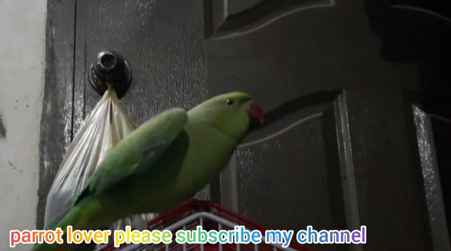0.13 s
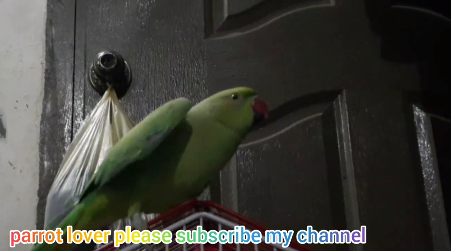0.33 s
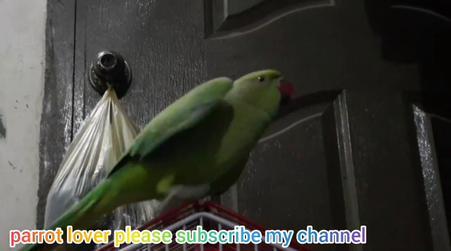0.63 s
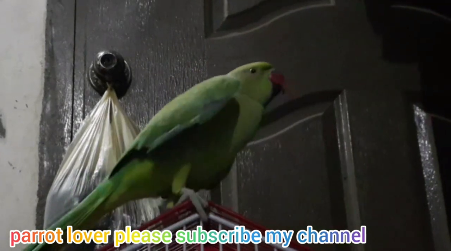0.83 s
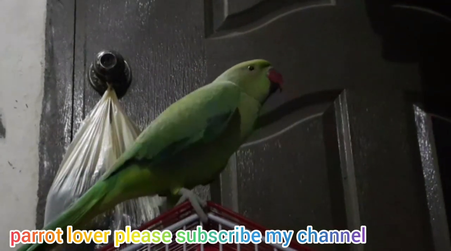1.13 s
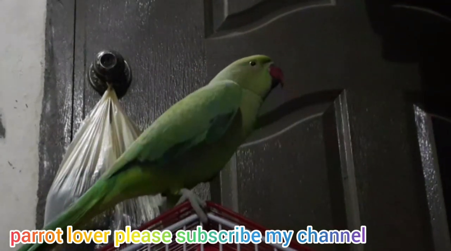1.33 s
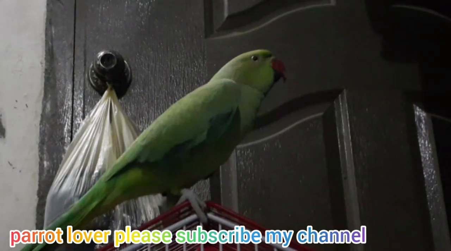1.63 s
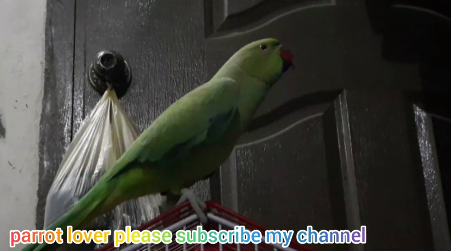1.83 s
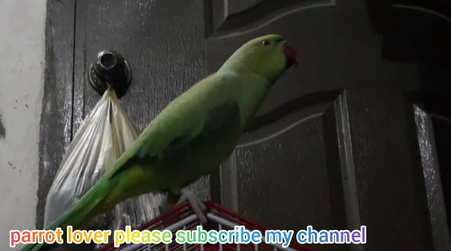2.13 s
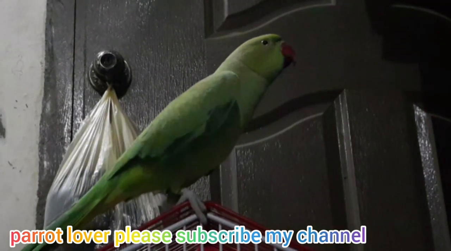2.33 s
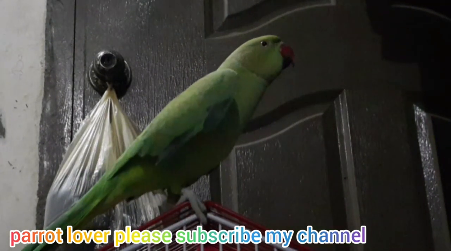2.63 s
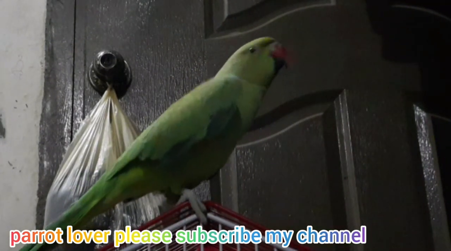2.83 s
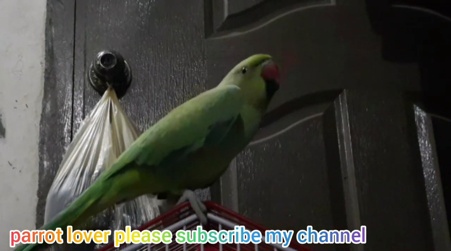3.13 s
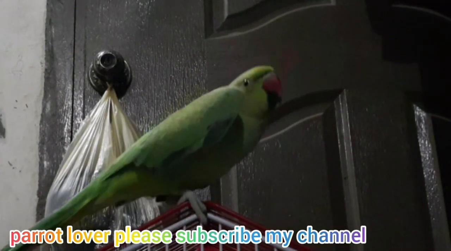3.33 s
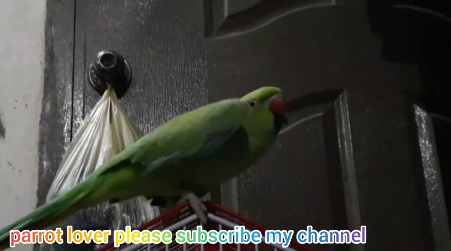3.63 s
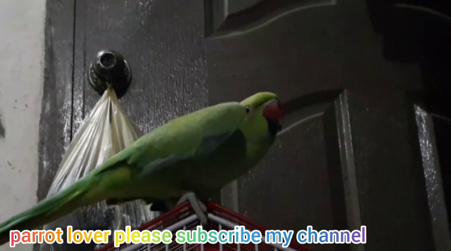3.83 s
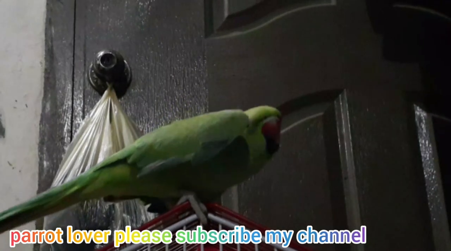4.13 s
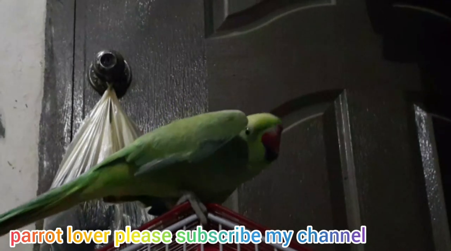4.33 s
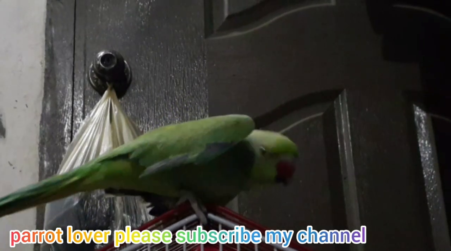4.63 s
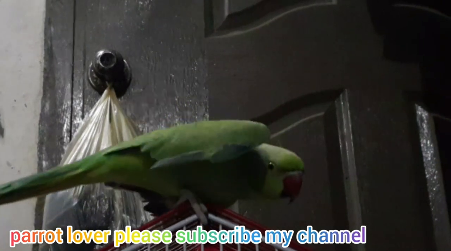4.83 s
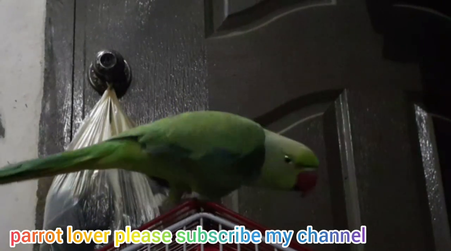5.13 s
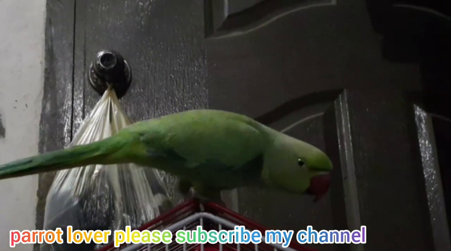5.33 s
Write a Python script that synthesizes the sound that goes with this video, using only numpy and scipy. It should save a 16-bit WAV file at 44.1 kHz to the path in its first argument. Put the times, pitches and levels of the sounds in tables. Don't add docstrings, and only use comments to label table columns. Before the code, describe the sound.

Close indoor parrot calls: piercing chirps, a run of soft throaty clucks, a loud short rattle, then squawk, falling whistle and long arching squawk.

```python
import sys
import numpy as np
from scipy import signal
from scipy.fft import rfft, irfft, next_fast_len
from scipy.io import wavfile
from scipy.ndimage import uniform_filter1d, map_coordinates

SR = 44100
rng = np.random.default_rng(int(sys.argv[2]) if len(sys.argv) > 2 else 0)


def makeup_ratio(level_db):
    decades = np.asarray(level_db, float) / 20
    return 10 ** decades


def wav_out(sig):
    wavfile.write(sys.argv[1], SR, np.round(np.clip(np.atleast_2d(sig).T, -1, 1) * 32767).astype(np.int16))


N = 242550
TIME_S = np.arange(N) / SR

# time of the top pitch in seconds, run-up in seconds, top pitch in Hz, peak level in dB.
CLUCK_EVENTS = [
    (1.807, 0.018, 1120, -39),
    (1.99, 0.016, 1004, -31.5),
    (2.213, .056, 967, -28),
    (2.453, .058, 930, -29.5),
    (2.701, 0.055, 951, -30),
]
CLUCK_PAN_DB = -4


def unit(x):
    return x / np.sqrt(np.mean(x ** 2) + 1e-20)


def along(points, hz):
    f, v = np.transpose(points)
    return np.interp(np.log(hz + 1), np.log(f + 1), v)


def curves(rows, t):
    s, *cols = np.transpose(rows)
    return [np.interp(t, s, c) for c in cols]


def wobble(rate_hz, size=N):
    knots = rng.standard_normal(int(size * rate_hz / SR) + 4)
    return map_coordinates(knots, [np.arange(size) * rate_hz / SR])


def phase_of(hz):
    return 2 * np.pi * np.cumsum(hz) / SR


def filtered(x, response):
    m = next_fast_len(N + SR // 2)
    return irfft(rfft(x, m) * response(np.fft.rfftfreq(m, 1 / SR)), m)[..., :N]


def resonances(modes, hz):
    total = 0
    for k, (centre_hz, width_hz, db) in enumerate(modes):
        damping = 1j * hz * width_hz
        total = total + (-1) ** k * makeup_ratio(db) * damping / (centre_hz ** 2 - hz ** 2 + damping)
    return total


def sides(pan_db):
    return makeup_ratio(np.array([pan_db / 2, -pan_db / 2]))


def noise_pair(spectrum, alike):
    def shares(hz):
        turn = np.arccos(np.clip(along(alike, hz), -1, 1)) / 2
        return makeup_ratio(along(spectrum, hz)) * [np.cos(turn), np.sin(turn)]
    mid, side = filtered(rng.standard_normal((2, N)), shares)
    return unit(np.array([mid + side, mid - side]))


def soft_tone(rows, unsteady_db):
    hz, db = curves(rows, TIME_S)
    edge = np.clip(np.minimum(TIME_S - rows[0][0], rows[-1][0] - TIME_S) / 0.0069, 0, 1)
    return edge * makeup_ratio(db + 7.5 + unsteady_db * wobble(30)) * np.sin(phase_of(hz))


def hiss():
    # frequency in Hz, density in dB per Hz.
    hiss_spectrum = [(3000, -30), (9000, -9), (12500, 0), (16000, -2)]
    return makeup_ratio(-87) * noise_pair(hiss_spectrum, [(5000, 0.0074)])


def hum(bird):
    # frequency in Hz, density in dB per Hz.
    hum_spectrum = [(22, -22), (38, -5.5), (57, -11.5), (70, -10.5), (178, -5.5), (318, -6), (420, -14),
                    (464, -7), (540, -12.5), (830, -13.5), (1100, -21), (1640, -19.5), (2120, -29.5),
                    (12700, -38.5), (16000, -41)]
    # frequency in Hz, left-right likeness from -1 to 1.
    hum_likeness = [(60, 1), (240, 0.77), (950, 1), (3770, -0.18), (15000, -0.4)]
    hum_db, lift_db, lift_s, lift_from_db, lift_range_db = -70.5, 7, 0.23, -57.5, 34.5
    power = uniform_filter1d(bird.mean(axis=0) ** 2, round(lift_s * SR))
    bird_db = 10 * np.log10(abs(power) + 1e-12)
    air_db = hum_db + lift_db * np.clip((bird_db - lift_from_db) / lift_range_db, 0, 1)
    return makeup_ratio(air_db + 2.5 + 0.28 * wobble(15.0)) * noise_pair(hum_spectrum, hum_likeness)


def fan():
    # frequency in Hz, level in dB.
    fan_tones = [(45, -74.5), (177, -75), (216, -75), (354, -77.5), (616, -79.5), (1660, -87.5)]
    out = np.zeros(N)
    for hz, db in fan_tones:
        varying_hz = hz * (1 + 0.0085 * wobble(5.1))
        out += makeup_ratio(db + 4 * wobble(9)) * np.sin(phase_of(varying_hz))
    return out


def motor():
    # time in seconds, half length in seconds, peak level in dB.
    swells = [
        (0.206, 0.14, -68.5),
        (1.059, .08, -73.5),
    ]
    whine_hz, sink_hz_per_s, whine_db, whine_fade_db_per_s = 918, 135, -72, 10
    drone_hz, gone_s = 314, 1.1
    drone_db = np.max([db - 12 * ((TIME_S - s) / half_s) ** 2 for s, half_s, db in swells], axis=0)
    lines = [(whine_hz - sink_hz_per_s * TIME_S, whine_db - whine_fade_db_per_s * TIME_S),
             (drone_hz - 10 * TIME_S, np.maximum(drone_db, -90)),
             (2 * drone_hz - 20 * TIME_S, np.maximum(drone_db - 6.0, -95))]
    out = np.zeros(N)
    for hz, db in lines:
        varying_hz = hz * (1 + 0.017 * wobble(40))
        out += makeup_ratio(db + 7.5 + 6.8 * wobble(30)) * np.sin(phase_of(varying_hz))
    return (TIME_S < gone_s) * out


def noisy_call():
    # frequency in Hz, density in dB per Hz.
    call_spectrum = [(1470, -40), (2500, -13.5), (3490, -16.5), (4140, -10), (6970, -13), (7830, -5),
                     (16000, 0)]
    start_s, attack_s, call_db, comb_hz, comb_depth_db = 5.39, .04, -65.5, 2560, 6
    rasp = filtered(noise_pair(call_spectrum, [(5000, .5)]),
                   lambda hz: makeup_ratio(comb_depth_db * (np.cos(2 * np.pi * hz / comb_hz) - 1.0)))
    return makeup_ratio(call_db + 2.8 * wobble(60)) * np.clip((TIME_S - start_s) / attack_s, 0, 1) * rasp


def background(bird):
    return (hum(bird) + fan() + motor() + noisy_call() + hiss()) * sides(-2.5)[:, None]


def neighbour():
    # time in seconds, pitch in Hz, level in dB.
    far_whistle = [
        (3.32, 2005, -78.5),
        (3.35, 1980, -69.5),
        (3.445, 2130, -85),
    ]
    return soft_tone(far_whistle, unsteady_db=6)


def room(x):
    # frequency in Hz, decay time t60 in seconds.
    decay_times = [(300, 0.48), (1500, 0.21), (4000, 0.21), (8000, 0.23), (15000, 0.069)]
    # frequency in Hz, tail level in dB.
    tail_colour = [(400, -12), (900, -6), (2000, 0), (16000, 0)]
    hz, t, z = signal.stft(rng.standard_normal((2, SR)), SR, nperseg=256)
    decay = t / along(decay_times, hz)[:, None]
    fall = makeup_ratio(-60 * decay) + makeup_ratio(-28.5 - 30 * decay)
    tail = signal.istft(z * makeup_ratio(along(tail_colour, hz))[:, None] * fall, SR, nperseg=256)[1]
    tail = tail * np.clip(np.arange(tail.shape[1]) / SR / .009, 0, 1)
    tail = makeup_ratio(-8.0) * tail / np.linalg.norm(tail[0])
    echo_s = rng.uniform(.001, .02, (8, 1)) + rng.normal(0, .0001, (8, 2))
    for at_s, strength in zip(echo_s, rng.choice([-1, 1], 8) * makeup_ratio(-22)):
        tail[[0, 1], (at_s * SR).astype(int)] += strength
    return signal.fftconvolve(x.mean(axis=0)[None], tail, axes=1)[:, :N]


def chest():
    hz, sag_hz_per_s, lead_s, lag_s, end_s = 405, 450, .04, .02, .13
    peak_db, fade_db, spent_db_per_s = -58.5, 11.5, 98
    out = np.zeros(N)
    for s, run_up_s, *_ in CLUCK_EVENTS:
        rows = [(s - lead_s, hz, peak_db - fade_db),
                (s + lag_s, hz, peak_db),
                (s + end_s, hz - sag_hz_per_s * end_s, peak_db - fade_db)]
        out += makeup_ratio(-spent_db_per_s * run_up_s) * soft_tone(rows, unsteady_db=-1.0)
    return out * sides(CLUCK_PAN_DB)[:, None]


def voice(calls, throat, colour, jitter, shimmer_db, hoarse, spread_hz, fade_s=.006, strain=0):
    over_base, over_gain, slope_base, slope_gain = colour
    out = np.zeros((2, N))
    for rows, pan_db in calls:
        a, b = round(rows[0][0] * SR), round(rows[-1][0] * SR)
        n, t = b - a, np.arange(a, b) / SR
        pitch, db = uniform_filter1d(curves(rows, t), size=300, mode="nearest")
        effort_db = db + 25
        over_db = over_base + over_gain * effort_db
        slope_db = slope_base + slope_gain * effort_db
        pitch = pitch * (1 + jitter * wobble(400, n) + .004 * wobble(45, n))
        phase = phase_of(pitch)
        k = np.arange(1, 17000 // pitch.min() + 1)[:32, None]
        size = makeup_ratio((k > 1) * (over_db + slope_db * np.log2(k / 2))) * abs(resonances(throat, k * pitch))
        size = size * (k * pitch < 17000)
        size = size / np.sqrt(np.sum(size ** 2, axis=0) / 2)
        fray = np.array([wobble(spread_hz, n) + 1j * wobble(spread_hz, n) for _ in k])
        share = np.clip(hoarse * makeup_ratio(strain * (db - db.max())) * (k - 1) ** 1.5, 0, .8)
        flutter = makeup_ratio(shimmer_db * 0.4 * np.minimum(k, 8) * np.array([wobble(55, n) for _ in k]))
        waves = np.imag((np.sqrt(1 - share ** 2) + share * fray) * np.exp(1j * k * phase))
        tone = np.sum(size * flutter * waves, axis=0)
        edge = np.clip(np.minimum((t - t[0] + (a == 0)) / .005, (t[-1] - t) / fade_s), 0, 1)
        out[:, a:b] += tone * edge * makeup_ratio(db - 0.5) * sides(pan_db)[:, None]
    return out


def trill():
    burst_peaks = [
        -35,
        -28,
        -7.5,
        -8,
        -6.5,
        -4,
        -11,
    ]
    # frequency in Hz, width in Hz, level in dB.
    open_throat = [(1020, 150, -25.5), (1810, 160, -9), (2366, 180, -5), (3180, 940, -5), (5640, 1400, -1),
                   (8900, 15000, -10.5)]
    start_s, every_s, burst_s, pan_db = 2.993, .0172, 0.0098, -2.5
    out, t = np.zeros((2, N)), np.arange(SR // 50) / SR
    ring = resonances(open_throat, np.fft.rfftfreq(len(t), 1 / SR))
    for n, db in enumerate(burst_peaks):
        i = round((start_s + n * every_s) * SR)
        rate_hz = 1250 - 70000 * t + 90 * wobble(400, len(t))
        slaps = (.5 + .5 * np.cos(phase_of(rate_hz))) ** 14
        swell = np.clip(t / 0.0013, 0, 1) * np.clip((burst_s - t) / 0.0023, 0, 1)
        rough = 1 + 0.15 * rng.standard_normal(len(t))
        burst = irfft(rfft(swell * slaps * rough) * ring, len(t))
        burst = makeup_ratio(db - 3.0) * burst / abs(burst).max()
        out[:, i:i + len(t)] += burst * sides(pan_db)[:, None]
    return out


def cluck(top_s, run_up_s, top_hz, db):
    slack_hz, climb_hz_per_s, swell_db_per_s, held_db_per_s = 456, 7000, 297, 81.5
    drop_s = .022 + 0.45 * run_up_s
    top_db = db - held_db_per_s * run_up_s
    return [(top_s - run_up_s, top_hz - climb_hz_per_s * run_up_s, top_db - swell_db_per_s * run_up_s),
            (top_s, top_hz, top_db),
            (top_s + drop_s / 2, 0.22 * top_hz + 0.84 * slack_hz, db),
            (top_s + drop_s, slack_hz, db - 4)]


def clucks():
    # frequency in Hz, width in Hz, level in dB.
    shut_beak = [(704, 420, 1), (1854, 340, 2.5), (3540, 230, 1), (5520, 240, 2), (8160, 540, -9),
                 (13600, 2900, -22.5)]
    calls = [(cluck(*row), CLUCK_PAN_DB) for row in CLUCK_EVENTS]
    return voice(calls, shut_beak, (0.87, 0.26, -0.17, 0.4), jitter=.012, shimmer_db=1.2, hoarse=.24,
                 spread_hz=900, fade_s=.012, strain=.8)


def squawks():
    # frequency in Hz, width in Hz, level in dB.
    wide_beak = [(1140, 3500, 2), (2696, 4400, 4.5), (5270, 630, 8), (7450, 1000, -8), (10530, 790, -5),
                 (14340, 2700, -21.5)]
    # time in seconds, pitch in Hz, level in dB.
    short_call = [(3.155, 1608, -25), (3.185, 1451, -25), (3.207, 1473, -21), (3.239, 1566, -27),
                  (3.258, 1521, -31.5)]
    lead_in = [(3.94, 554.8, -40), (3.954, 737.4, -42), (3.97, 927, -39), (3.996, 947, -28),
               (4.01, 952, -32)]
    arch_call = [(4.01, 993.7, -33), (4.082, 1147, -23), (4.145, 1329, -22), (4.2, 1238, -22),
                 (4.235, 1218, -20), (4.264, 1093, -19), (4.274, 1031, -26.5), (4.304, 916, -19.5),
                 (4.356, 567, -38)]
    out = voice([(short_call, -4.5)], wide_beak, (9.5, 0.8, -11.5, 0.44),
                jitter=.006, shimmer_db=1.3, hoarse=.07, spread_hz=700)
    out += voice([(lead_in, -1)], wide_beak, (2, 0.44, -1.5, 0.66),
                 jitter=.005, shimmer_db=2, hoarse=.022, spread_hz=700, strain=-.5)
    out += voice([(arch_call, -2.5)], wide_beak, (-3, 1.2, -3, -0.4),
                 jitter=.003, shimmer_db=1.4, hoarse=.019, spread_hz=700)
    return out


def falling_call():
    # frequency in Hz, width in Hz, level in dB.
    tube = [(2270, 2000, -2), (5500, 1800, -3.5), (7220, 880, -2), (9900, 900, 2), (11500, 1200, -8),
            (13300, 1300, -9)]
    # time in seconds, pitch in Hz, level in dB.
    fall = [(3.457, 2885, -40), (3.463, 2770, -35), (3.485, 2525, -31), (3.517, 2317, -28),
            (3.579, 1985, -46)]
    held = [(3.578, 1943, -35), (3.59, 1996, -35), (3.636, 1914, -24), (3.67, 1816, -24),
            (3.722, 1973, -19), (3.757, 2001, -32.5)]
    beat_share, depth, strained_depth, strain_s = .175, .09, .3, 3.705
    depth = depth + (strained_depth - depth) * np.clip((TIME_S - strain_s) / 0.024, 0, 1)
    beat_hz = beat_share * curves(fall + held, TIME_S)[0] * (1 + 0.083 * wobble(80))
    beating = 1 + depth * np.sin(phase_of(beat_hz))
    out = voice([(fall, -3)], tube, (-18, -1.1, -2.5, 1),
                jitter=.004, shimmer_db=1.5, hoarse=.2, spread_hz=1600)
    out += voice([(held, 1)], tube, (-24.5, -0.35, 1.5, 0.95),
                 jitter=.002, shimmer_db=1.7, hoarse=.035, spread_hz=1100)
    return beating * out


def whistles():
    # frequency in Hz, width in Hz, level in dB.
    narrow_beak = [(2170, 2600, 1.5), (5670, 460, 5), (9430, 3800, 1), (10483, 390, -1), (14000, 500, -6),
                   (15100, 2144, -8)]
    # time in seconds, pitch in Hz, level in dB.
    first_call = [(0, 1750, -32), (.016, 1787, -30.5), (.036, 2408, -29), (.068, 3646, -14.5),
                  (.096, 3594, -32.5)]
    rise = [(.622, 668.5, -54), (.642, 1115, -44.5), (.69, 1301, -45.5), (.748, 1848, -32),
            (.76, 2030, -34.5), (.792, 2391, -25), (.832, 2879, -26), (.862, 2873, -48)]
    swoop = [(.871, 3328, -23.5), (.905, 2348, -27.5), (.929, 2094, -40), (.959, 1988, -36.5),
             (.973, 1949, -33), (1.013, 2977, -16), (1.028, 3412, -18), (1.044, 3580, -33)]
    out = voice([(first_call, -1)], narrow_beak, (-9, 0.45, -11, -1.15),
                jitter=.004, shimmer_db=1.8, hoarse=.18, spread_hz=1800)
    out += voice([(rise, -3.5)], narrow_beak, (-13, .5, -1, 1.3),
                 jitter=.004, shimmer_db=1.8, hoarse=.26, spread_hz=1800, strain=.3)
    out += voice([(swoop, -3.5)], narrow_beak, (-14, 0.09, -6, 0),
                 jitter=.004, shimmer_db=1.8, hoarse=.16, spread_hz=1800)
    return out


def at_ports(x):
    # frequency in Hz, lead of the left port in radians.
    port_lead = [(200, -3.4), (700, -4.7), (1500, -0.099), (3000, -1.1), (5200, -0.61), (9000, -1.5),
                 (14000, -0.84)]
    return filtered(x, lambda hz: np.exp(.5j * along(port_lead, hz) * np.array([[1], [-1]])))


def scene():
    bird = whistles() + falling_call() + clucks() + squawks() + trill() + neighbour()
    heard = at_ports(bird) + room(bird) + chest()
    return heard + background(heard)


def top_cut(x):
    return signal.sosfilt(signal.butter(12, 16140, fs=SR, output="sos"), x)


def record(dry):
    mix = filtered(dry, lambda hz: hz < 15900)
    return top_cut(mix)


dry = scene()
out = record(dry)
wav_out(out)
```